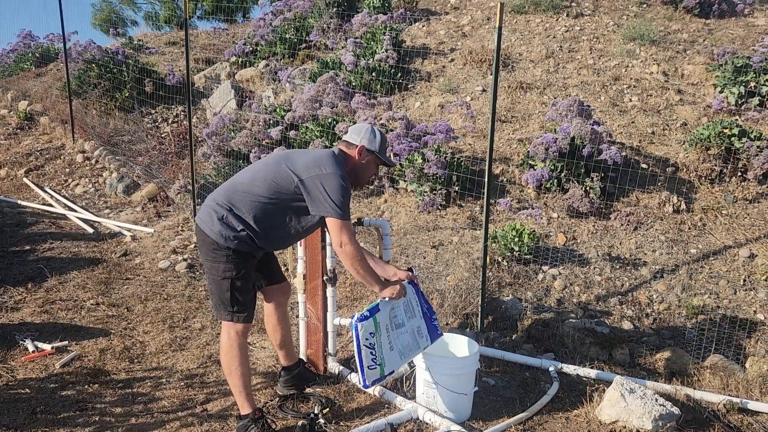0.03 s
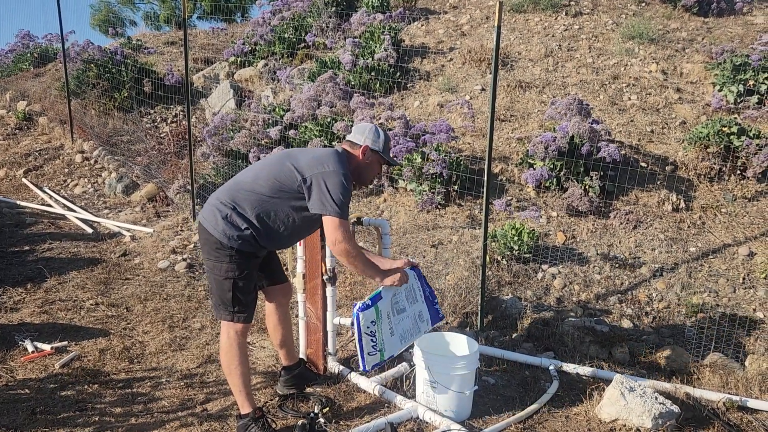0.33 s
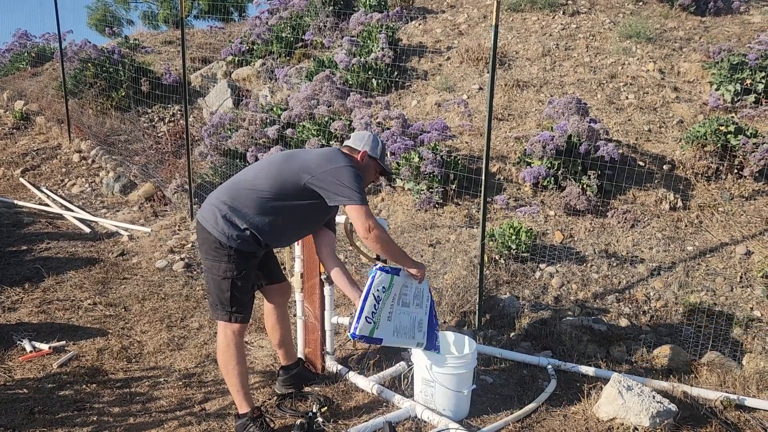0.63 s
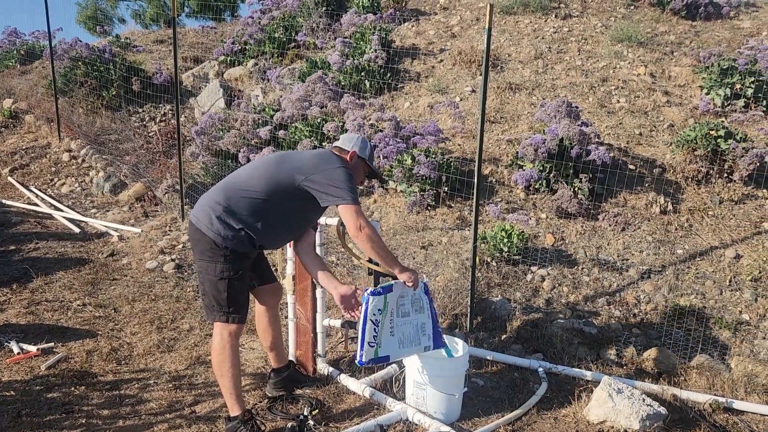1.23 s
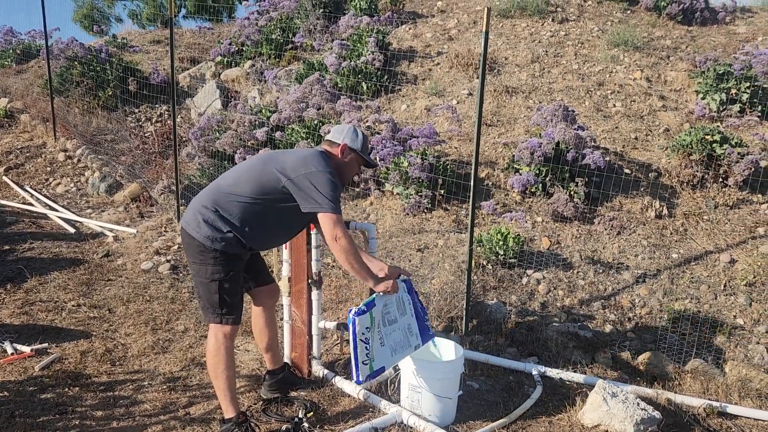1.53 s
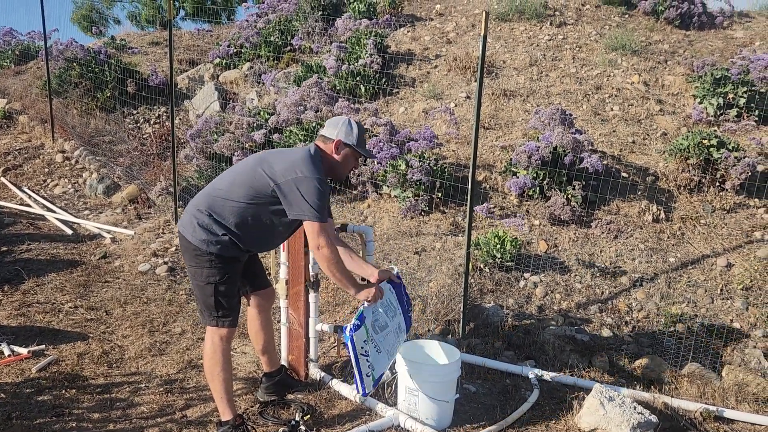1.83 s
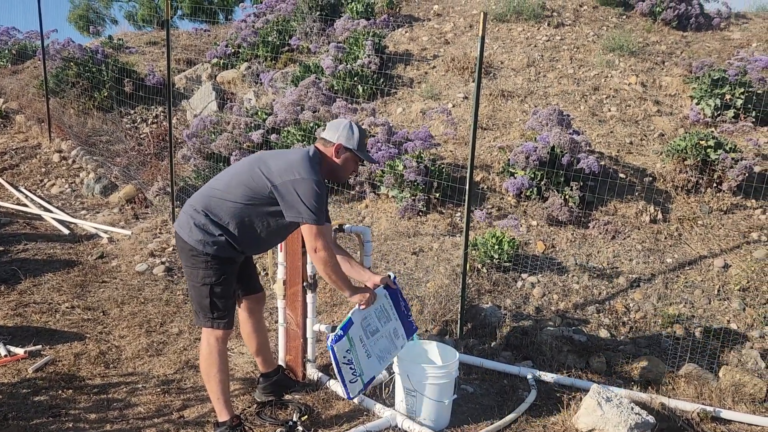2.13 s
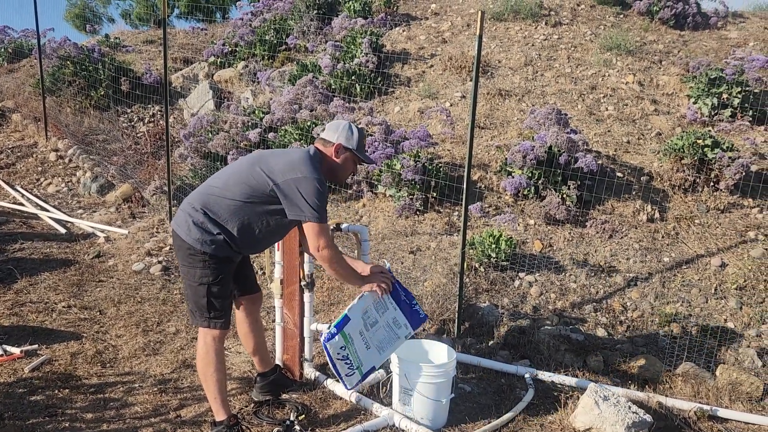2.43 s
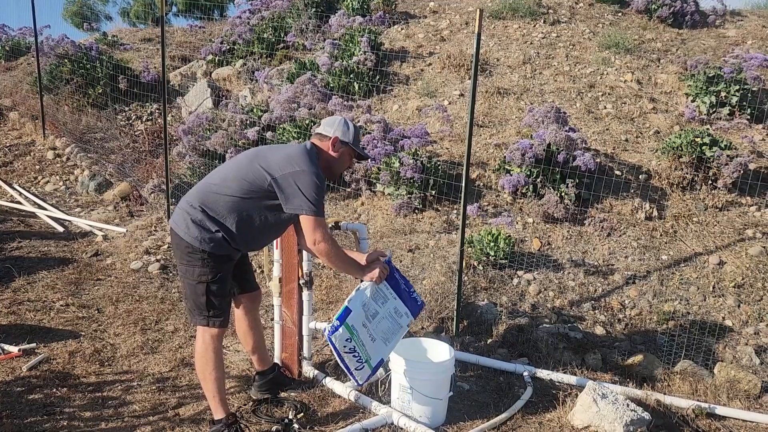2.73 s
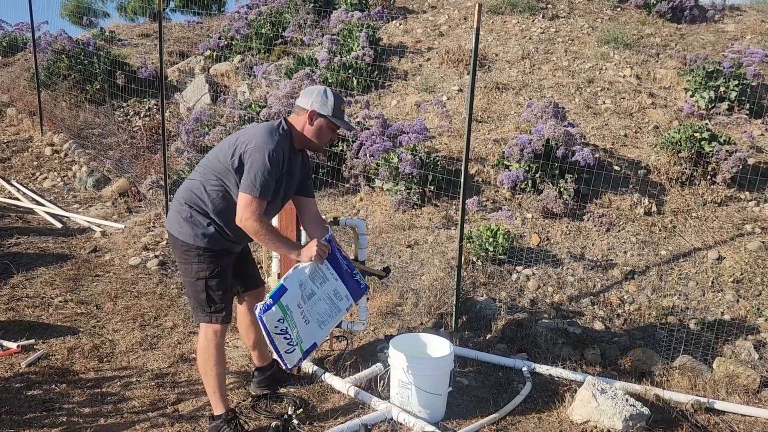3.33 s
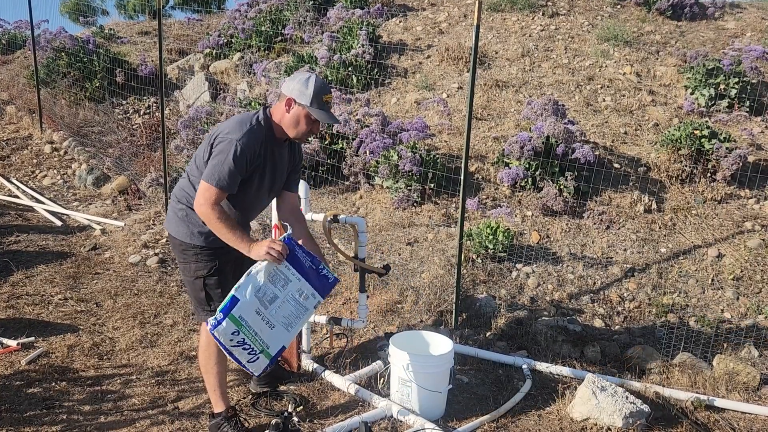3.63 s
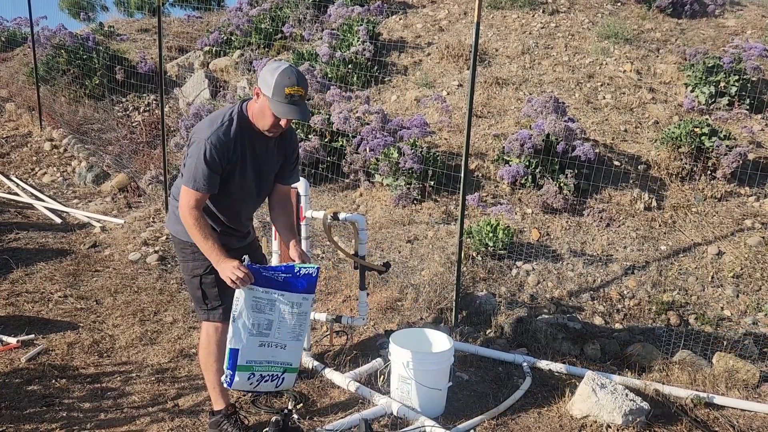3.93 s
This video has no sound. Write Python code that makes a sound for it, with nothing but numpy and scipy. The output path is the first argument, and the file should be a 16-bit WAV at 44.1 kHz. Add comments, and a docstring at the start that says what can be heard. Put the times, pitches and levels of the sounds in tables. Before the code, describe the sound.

A stiff plastic bag crackles as grains hiss out into a bucket in light wind.

```python
"""Wind buffets the microphone over a quiet hillside as a stiff plastic bag is tipped over a bucket.
For two seconds the last granules are shaken out, about six shakes a second: they hiss along the film
and patter into the bucket, while the film crinkles and snaps and the bag's wall thumps softly.
The shakes then fade and the film crackles on as the bag is lifted.
From 3.5 s, under more buffets of wind, what is left slides through the bag in one long rush."""
import sys
import numpy as np
from scipy import signal
from scipy.fft import rfft, irfft
from scipy.io import wavfile
from scipy.ndimage import uniform_filter1d

SR = 44100
rng = np.random.default_rng(int(sys.argv[2]) if len(sys.argv) > 2 else 0)


def transcribe(signal):
    """Save signal, clipped to [-1, 1], as a 16-bit WAV file at the path in sys.argv[1]."""
    frames = np.atleast_2d(signal).T
    limited = np.clip(frames, -1, 1)
    pcm = np.round(limited * 32767).astype(np.int16)
    wavfile.write(sys.argv[1], SR, pcm)


N = 4 * SR


def amp(db):
    """Decibels to gain."""
    return 10 ** (np.asarray(db) / 20)


def unit(x):
    """Normalises to rms 1."""
    return x / np.sqrt(np.mean(x ** 2) + 1e-20)


def curve(points, hz):
    """Reads a table on a log-frequency axis."""
    f, value = np.transpose(points)
    return np.interp(np.log(hz + 1), np.log(f + 1), value)


def fader(points):
    """Gain per sample from a table of t/s, level/dB."""
    return amp(np.interp(np.arange(N) / SR, *np.transpose(points)))


def add(mix, s, sound):
    """Mixes a sound in at time s."""
    part = mix[:, max(round(s * SR), 0):][:, :sound.shape[-1]]
    part += sound[..., :part.shape[1]]


def pan(x, left_db):
    """Leans a sound to the left."""
    return x * amp([[left_db / 2], [-left_db / 2]])


def band(x, hz, kind):
    """Third-order Butterworth filter."""
    return signal.sosfilt(signal.butter(3, hz, kind, fs=SR, output="sos"), x)


def eq(x, points):
    """Minimum-phase EQ from a table of f/Hz, level/dB."""
    cepstrum = irfft(curve(points, np.fft.rfftfreq(4096, 1 / SR)) * np.log(10) / 20)
    cepstrum[1:2048] *= 2  # fold onto positive time: no pre-ring
    cepstrum[2049:] = 0
    impulse = irfft(np.exp(rfft(cepstrum)))
    return signal.oaconvolve(x, impulse[None], axes=1)[:, :x.shape[1]]


# Stereo correlation: f/Hz, likeness/0-1
LIKENESS = [(100, 1), (900, 0.83), (2300, 0.87), (3100, 0.14), (4200, 0.47), (8000, 0.26), (15000, 0.13)]
# Stereo balance, left minus right: f/Hz, level/dB
BALANCE = [(950, 0.2), (2400, 2.5), (6000, -0.5), (13000, 5)]
# Usual phase lead of the left side: f/Hz, lead/rad
LEFT_LEAD = [(100, 0.3), (2300, 0.25), (3300, 0.33), (4500, 0), (6000, 1)]
def stereo(x, lead=LEFT_LEAD):
    """Blends two unrelated signals into the pair heard at the microphone's two ports."""
    hz = np.fft.rfftfreq(x.shape[1], 1 / SR)
    left, other = rfft(x)
    same = np.clip(curve(LIKENESS, hz), 0, 1)
    lean = amp(curve(BALANCE, hz) / 2)
    right = (same * left + np.sqrt(1 - same ** 2) * other) * np.exp(-1j * curve(lead, hz))
    return irfft(np.array([left * lean, right / lean]), x.shape[1])


def grains(per_s, spread_db, wash):
    """Tiny impacts of uneven size over a wash of finer ones."""
    size = amp(spread_db * np.minimum(rng.exponential(1, N), 4.5))
    hits = rng.random(N) < per_s / SR
    clicks = size * hits * rng.choice([-1., 1.], (2, N))
    return unit(unit(clicks) + wash * rng.standard_normal((2, N)))


def facet(x, uneven_db):
    """Gives a sound the chance resonances of one patch of plastic."""
    hz = np.geomspace(500, 16000, num=22)
    return eq(x, np.column_stack([hz, uneven_db * rng.standard_normal(len(hz))]))


def rattle(per_s, spread_db, wash, ring_s, uneven_db, patches):
    """Impacts of uneven size on patches of plastic, each ringing briefly, over a wash of finer ones."""
    t = np.arange(768) / SR
    decay = np.exp(-t / ring_s)
    rings = [unit(facet(rng.standard_normal((2, len(t))) * decay, uneven_db)) for _ in range(patches)]
    size = amp(spread_db * np.minimum(rng.exponential(1, N), 3.5)) * rng.choice([-1., 1.], N)
    patch = rng.integers(0, patches, N)
    out = np.zeros((2, N + len(t)))
    for i in np.flatnonzero(rng.random(N) < per_s / SR):
        out[:, i:i + len(t)] += size[i] * rings[patch[i]]
    return unit(unit(out[:, :N]) + wash * rng.standard_normal((2, N)))


# Tone of the ambience bed: f/Hz, level/dB
AIR_EQ = [(150, -10), (414, -21.5), (550, -20.5), (1000, -25.5), (1600, -33.5), (2020, -51), (2810, -43),
          (3920, -53), (8000, -38.5), (10600, -52), (12500, -56)]
def air():
    """The faint steady air of the hillside."""
    return amp(-64) * unit(stereo(eq(rng.standard_normal((2, N)), AIR_EQ)))


def hillside_echoes(x, wet_db, decay_s):
    """Adds weak scattered echoes from the ground and the slope."""
    t = np.arange(SR // 5) / SR
    taps = rng.standard_normal((2, len(t))) * np.exp(-t / decay_s) * (t > .002)
    return x + amp(wet_db) * signal.oaconvolve(x, taps / np.linalg.norm(taps[0]), axes=1)[:, :N]


def turbulence(tone, likeness=.68):
    """Wind noise, partly shared by left and right, held at an even level."""
    left, other = eq(rng.standard_normal((2, N)), tone)
    pair = np.array([left, likeness * left + np.sqrt(1 - likeness ** 2) * other])
    return pair / np.sqrt(uniform_filter1d((pair ** 2).mean(0), SR // 14))


# Rise and fall of the wind: t/s, level/dB
GUSTS = [(0, -32), (.17, -37), (.29, -39), (.41, -29), (.46, -43.5), (.95, -49.5), (1.1, -44), (1.6, -49),
         (2.3, -47.5), (2.8, -44.5), (3.0, -47), (3.25, -39.5), (3.54, -37), (3.7, -40.5), (4, -45)]
# Tone of the gusts: f/Hz, level/dB
GUST_EQ = [(20, -15.5), (53, 5), (96, -0.5), (124, -6), (241, -28), (420, -41), (600, -77), (1320, -120)]
# Single buffets: t/s, rumble level/dB, flutter level/dB
BUFFETS = [(0.151, -33, -46), (0.18, -33, -50), (0.338, -28, -57), (0.4, -34.5, -60), (3.272, -30, -69),
           (3.436, -28, -60.5), (3.626, -27, -56.5)]
# Tone of a buffet's rumble: f/Hz, level/dB
BUFFET_EQ = [(20, -6), (80, 4.5), (125, -6), (200, -22.5), (700, -78.5), (2000, -91)]
def wind():
    """Wind on the microphone: a lumpy rumble with short buffets on top."""
    t = np.arange(N) / SR
    rumble = turbulence(BUFFET_EQ)
    flutter = unit(band(rng.standard_normal(N), [190, 340], "band"))
    out = fader(GUSTS) * turbulence(GUST_EQ)
    for s, rumble_db, flutter_db in BUFFETS:
        swell = np.exp(-((t - s) / .016) ** 2)
        out += swell * (amp(rumble_db) * rumble + amp(flutter_db) * flutter)
    return pan(out, left_db=1.8)


# Thumps of the bag's wall: t/s, level/dB, f/Hz
FLAPS = [(0.606, -31, 77), (0.86, -35, 74.6), (1.296, -34.5, 79), (1.457, -28.5, 68), (2.497, -30, 78)]
def flaps(attack_s=.0052):
    """The wall of the bag swings once or twice and pushes air: a soft low thump."""
    out, t = np.zeros((2, N)), np.arange(SR // 10) / SR
    envelope = t / attack_s * np.exp(1 - t / attack_s)
    for s, db, hz in FLAPS:
        add(out, s, amp(db) * envelope * np.sin(2 * np.pi * hz * t))
    return out


# Flexing of the bag: t/s, level/dB
FLEX = [(0, -54.5), (.08, -61.5), (.12, -74), (.2, -77.5), (.25, -54), (.35, -74.5), (.47, -68.5),
        (1.0, -57.5), (1.5, -52.5), (1.66, -67.5), (1.78, -51.5), (1.89, -48), (2.04, -47.5), (2.1, -77),
        (2.2, -60), (2.31, -52), (2.38, -60), (2.72, -59.5), (2.82, -65), (2.9, -82), (3.2, -59.5),
        (3.27, -75)]
# Tone of the film, for crinkle and snaps: f/Hz, level/dB
FILM_EQ = [(180, -9.5), (603, -12.5), (725, -4.5), (1210, -2), (1580, -6), (2030, 2.5), (2930, -18.5),
           (3890, -6), (4750, -7), (5900, -18), (9710, -33), (13100, -40.5), (16000, -35)]
def crinkle():
    """Small creases give way while the bag flexes, in many different colours."""
    creases = rattle(per_s=650, spread_db=3.4, wash=.34, ring_s=.002, uneven_db=4.5, patches=30)
    return pan(fader(FLEX) * unit(stereo(eq(creases, FILM_EQ))), left_db=-.5)


# Buckles of the film, before the band trims: t/s, low level/dB, mid level/dB, top level/dB
SNAPS = [(0.1549, -47, -51, -80), (0.17, -49.5, -70, -57.5), (0.2084, -53.5, -57, -65),
         (0.2377, -48.5, -52, -59), (0.42, -42.5, -52, -58), (.4893, -40.5, -57, -52),
         (0.5994, -43.5, -50, -74), (.612, -40.5, -43.5, -52), (0.7706, -39.5, -49, -67),
         (0.7977, -33.5, -51, -68), (0.805, -33, -42.5, -58), (0.9032, -55, -43, -64),
         (.9087, -37, -34, -40.5), (1.2506, -46.5, -57, -59), (1.309, -45, -43, -65),
         (1.3829, -40, -35.5, -44), (1.7268, -42.5, -45.5, -48), (1.744, -41, -40, -48),
         (1.7666, -44, -47, -75), (1.824, -38.5, -49.5, -73), (1.8681, -39.5, -32, -69),
         (1.884, -35, -51, -56), (1.8983, -43.5, -59, -73), (2.006, -52, -57, -50),
         (2.0512, -43.5, -45.5, -67), (2.1233, -55.5, -58, -84), (2.249, -66, -71, -48),
         (2.2854, -51, -57, -79), (2.3124, -49, -52.5, -74), (2.4996, -41.5, -43.5, -72),
         (2.5241, -45.5, -51, -75), (2.5946, -50, -52, -71), (2.6307, -49, -53.5, -85),
         (2.6845, -47.5, -47, -71), (2.6985, -44.5, -53, -76), (2.7082, -45.5, -49.5, -76),
         (2.7671, -47.5, -41.5, -51.5), (2.8355, -43, -47.5, -72), (3.1558, -46.5, -53, -82),
         (3.1675, -50, -53.5, -71)]
def snaps(pre_roll_s=.012, trims_db=(-11.5, -10.5, -8)):
    """A large crease strains, cracks and rattles briefly; the ground returns the crack at once."""
    out, t = np.zeros((2, N)), np.arange(2600) / SR - pre_roll_s
    strain = amp(-13) * np.exp(-abs(t) / .004)
    tail = amp(1) * np.exp(-abs(t) / .0047)
    rattling = np.where(t < 0, strain, tail)
    click = (t >= 0) * np.exp(-(t / .0007) ** 2)
    for s, *bands_db in SNAPS:
        echo_s = .0017 * rng.uniform(.85, 1.15)
        echo = amp(-2.5) * np.roll(click, round(echo_s * SR))
        rattle_db = -.6 * (max(bands_db) + 44)  # the strongest snaps are the cleanest
        envelope = click + echo + amp(rattle_db) * rattling
        burst = facet(envelope * rng.standard_normal((2, len(t))), uneven_db=2.5)
        crack = stereo(eq(burst, FILM_EQ))
        parts = band(crack, 2630, "low"), band(crack, [3100, 6500], "band"), band(crack, 9250, "high")
        for db, trim_db, part in zip(bands_db, trims_db, parts):
            add(out, s - pre_roll_s, amp(db + trim_db) * unit(part))
    return out


# Flow into the bucket: t/s, level/dB
TRICKLE = [(.38, -63), (.5, -52.5), (.75, -58.5), (.88, -51), (1.08, -57), (1.4, -50.5), (1.52, -54.5),
           (1.64, -65), (2.0, -50), (2.15, -67), (2.7, -66), (2.9, -99)]
# Tone of the bucket: f/Hz, level/dB
BUCKET_EQ = [(180, -23.5), (330, -7), (462, -17), (870, -1), (1320, -10.5), (2070, -10), (2930, -26.5),
             (4670, -14), (6410, -16.5), (10200, -24), (16000, -25)]
def trickle():
    """Granules patter into the bucket, each making it ring briefly."""
    patter = rattle(per_s=1200, spread_db=4, wash=.24, ring_s=.0054, uneven_db=9, patches=16)
    return fader(TRICKLE) * unit(stereo(eq(patter, BUCKET_EQ)))


# Clumps dropping into the bucket: t/s, level/dB
CLUMPS = [(0.486, -40), (.688, -41), (0.723, -46), (0.771, -38.5), (.866, -40), (0.885, -45),
          (0.918, -39.5), (1.075, -49.5), (1.489, -50), (1.946, -46.5), (2.462, -48.5)]
# Tone of a clump: f/Hz, level/dB
CLUMP_EQ = [(300, -37.5), (600, -6.5), (950, -2), (1700, -12), (2200, -17), (2900, -28.5), (16000, -54)]
def clumps(attack_s=.0043):
    """A handful lands at once: a short dull patter."""
    patter = grains(per_s=2100, spread_db=.5, wash=.74)
    t, envelope = np.arange(N) / SR, np.zeros(N)
    for s, db in CLUMPS:
        age = np.maximum(t - s, 0) / attack_s
        envelope += amp(db) * age * np.exp(1 - age)
    return envelope * unit(stereo(eq(patter, CLUMP_EQ)))


# Surges of granules: peak t/s, attack/s, release/s, level/dB, treble shelf/dB
SHAKES = [(.445, 0.018, 0.012, -54, 11), (.508, 0.022, 0.026, -44, -23),
          (0.549, 0.039, 0.0097, -45.5, -4.5), (0.692, 0.028, 0.02, -42.5, -1),
          (.803, 0.028, 0.016, -45.5, 0.5), (0.856, 0.033, 0.021, -38, -0.5),
          (1.011, 0.045, 0.021, -39, 0.5), (1.166, 0.036, 0.0088, -40, 3), (1.306, 0.026, 0.012, -44.5, 6),
          (1.468, 0.031, 0.021, -41, 2.5), (1.738, 0.022, .016, -52.5, 7), (1.977, 0.038, 0.013, -43, -6.5),
          (2.04, 0.041, 0.025, -46, 0.5), (2.28, 0.022, 0.06, -66.5, 13.5), (2.59, 0.059, 0.011, -72, 18),
          (2.71, 0.057, 0.13, -57, 4), (3.054, 0.005, 0.026, -63, 7), (3.219, 0.019, 0.034, -56.5, -41)]
# Tone of granules hitting the film: f/Hz, level/dB
SHAKE_EQ = [(180, -7), (300, -10), (494, -19.5), (678, -8), (828, -1.5), (1460, -9), (1810, -2), (2210, -5),
            (2930, -19), (3580, -11.5), (4590, -10), (5520, -10.5), (6850, -25.5), (7570, -17.5),
            (10000, -25), (11900, -21), (16000, -26)]
def shakes():
    """Each shake throws granules along the film: a gritty hiss that swells and falls."""
    impacts = rattle(per_s=2600, spread_db=2.5, wash=.13, ring_s=.0021, uneven_db=4.5, patches=24)
    hiss = unit(stereo(eq(impacts, SHAKE_EQ)))
    treble = signal.sosfiltfilt(signal.butter(1, 4000, "high", fs=SR, output="sos"), hiss)
    t, out = np.arange(N) / SR, np.zeros((2, N))
    for s, attack, release, db, treble_db in SHAKES:
        swell = np.exp(-abs((t - s) / np.where(t < s, attack, release)) ** 2.2)
        out += amp(db) * swell * (hiss + (amp(treble_db) - 1) * treble)
    return pan(out, left_db=-.5)


# Swell of the closing slide: t/s, level/dB
SLIDE = [(3.53, -77), (3.565, -55.5), (3.6, -47.5), (3.665, -40), (3.84, -33), (3.9, -35), (3.945, -39),
         (4, -35)]
# Tone of the slide: f/Hz, level/dB
SLIDE_EQ = [(210, -30), (350, -23.5), (438, -18.5), (633, -17.5), (707, -10.5), (914, -3), (1120, -4),
            (1410, -5.5), (1650, -9.5), (1900, 0.5), (2200, -6), (2800, -15.5), (4040, -7.5), (5390, -12),
            (5840, -17.5), (7790, -16), (9750, -23.5), (12000, -19), (14300, -22), (16000, -24)]
# Phase lead of the left side in the slide: f/Hz, lead/rad
SLIDE_LEAD = [(100, -0.5), (1400, 0.83), (2100, 1.5), (15000, 2.6)]
def slide():
    """What is left runs through the lifted bag in a dense stream."""
    stream = grains(per_s=5000, spread_db=2.5, wash=.55)
    rush = unit(stereo(eq(stream, SLIDE_EQ), SLIDE_LEAD))
    return pan(fader(SLIDE) * rush, left_db=-.5)


def scene():
    """Bag and bucket with a touch of echo, over wind and open air."""
    pouring = shakes() + trickle() + clumps() + slide() + crinkle() + snaps()
    return hillside_echoes(pouring, wet_db=-19.5, decay_s=.02) + flaps() + wind() + air()


def record(dry):
    """A steep high cut near 16 kHz on the whole mix."""
    high_cut = signal.firwin(511, 15950, window=("kaiser", 9), fs=SR)
    return signal.oaconvolve(dry, high_cut[None], "same")


dry = scene()
out = record(dry)
transcribe(out)
```